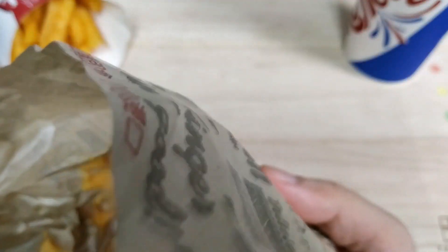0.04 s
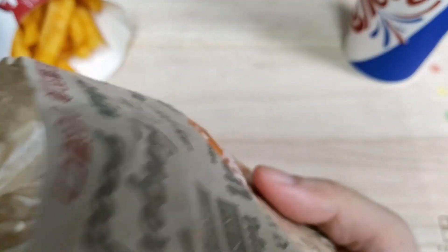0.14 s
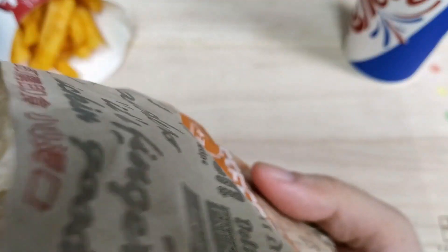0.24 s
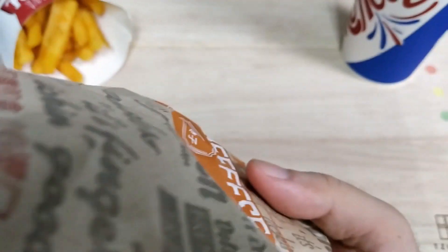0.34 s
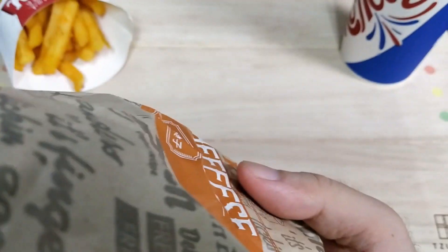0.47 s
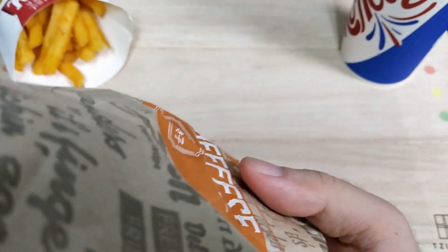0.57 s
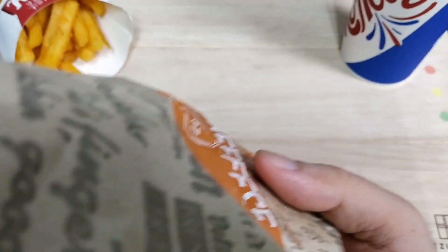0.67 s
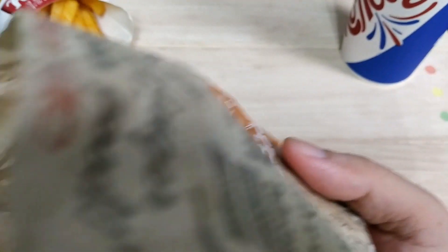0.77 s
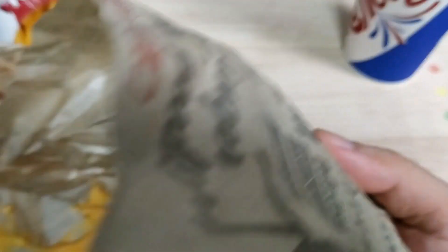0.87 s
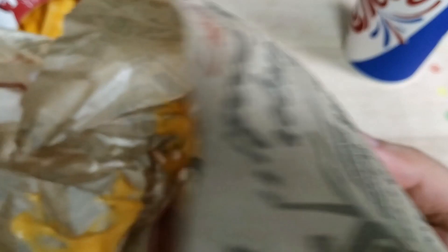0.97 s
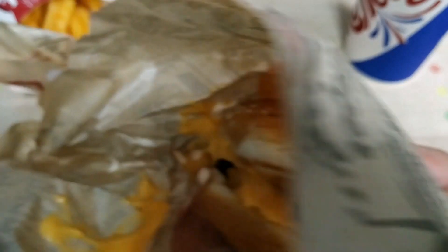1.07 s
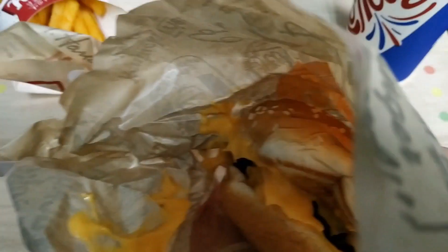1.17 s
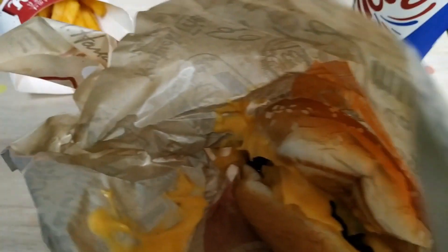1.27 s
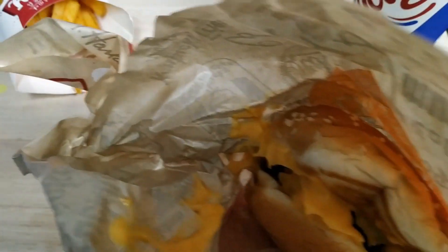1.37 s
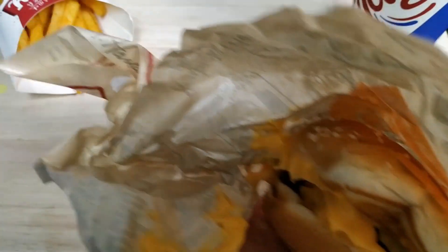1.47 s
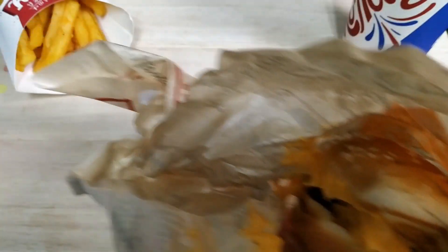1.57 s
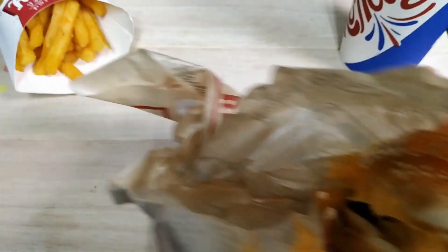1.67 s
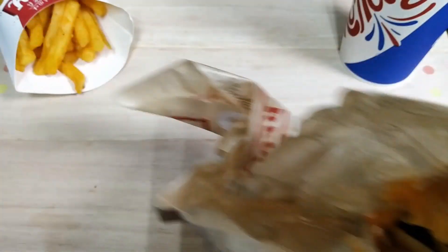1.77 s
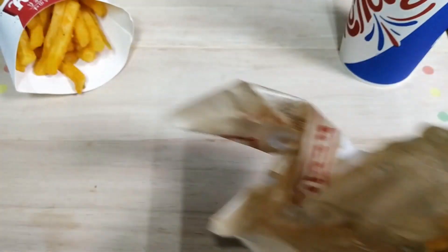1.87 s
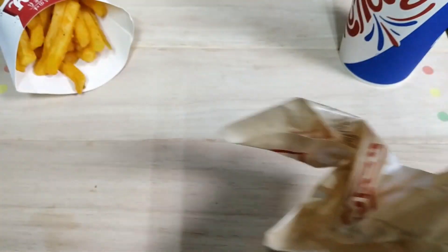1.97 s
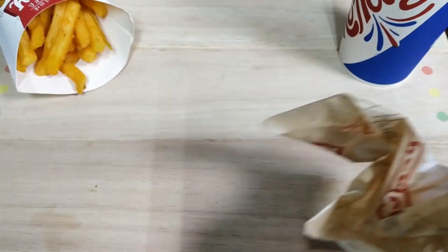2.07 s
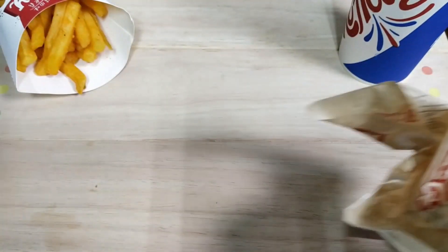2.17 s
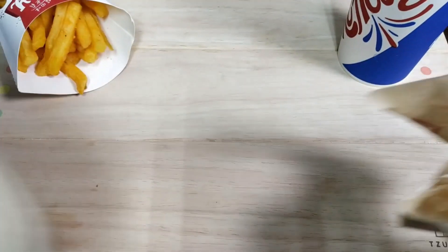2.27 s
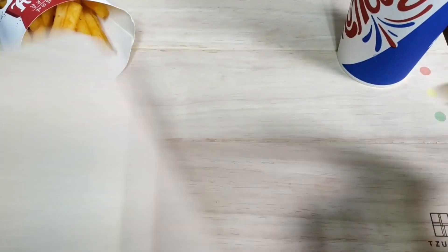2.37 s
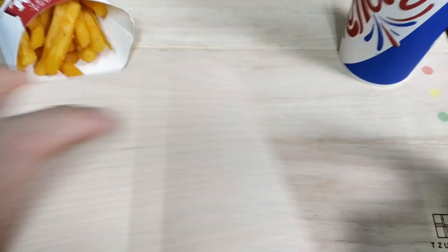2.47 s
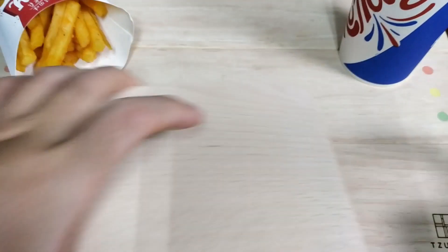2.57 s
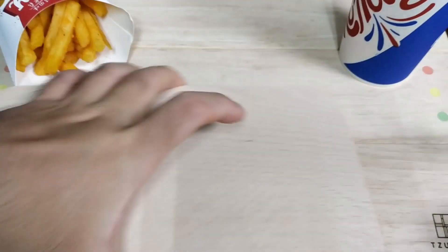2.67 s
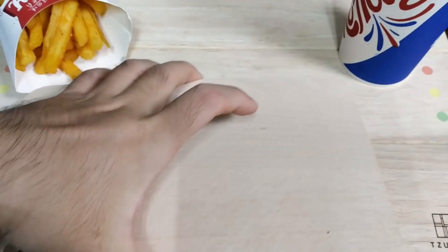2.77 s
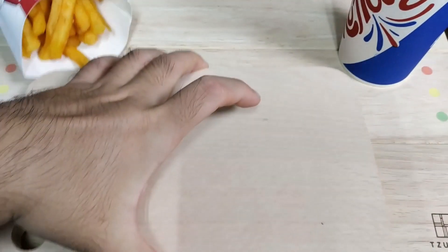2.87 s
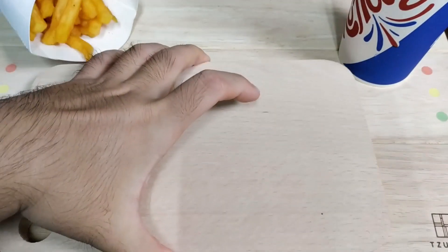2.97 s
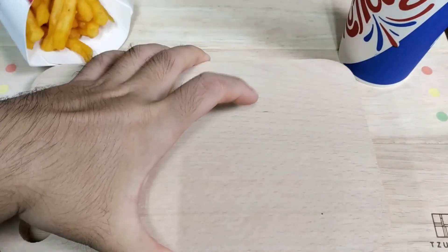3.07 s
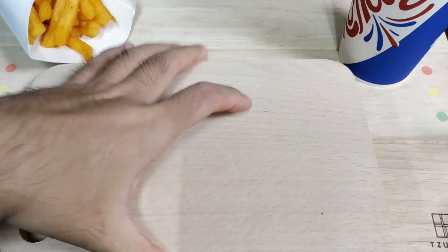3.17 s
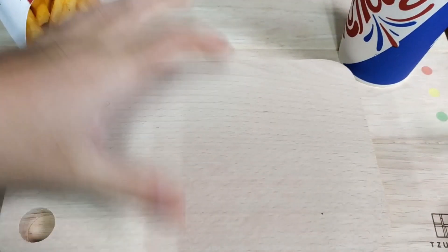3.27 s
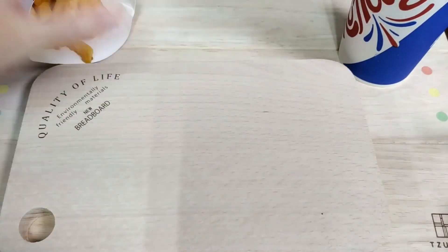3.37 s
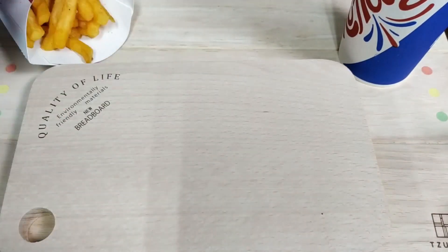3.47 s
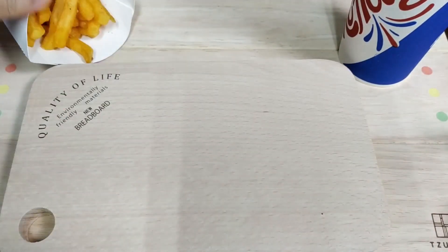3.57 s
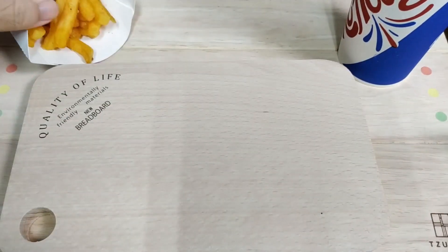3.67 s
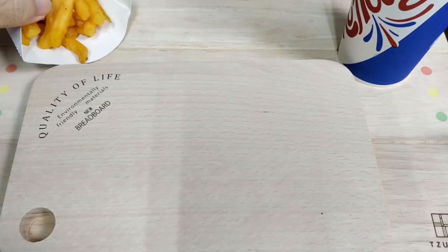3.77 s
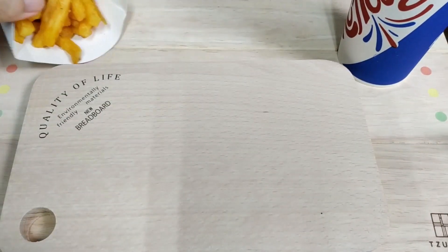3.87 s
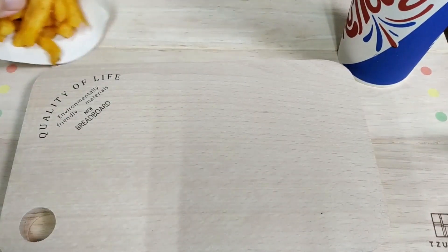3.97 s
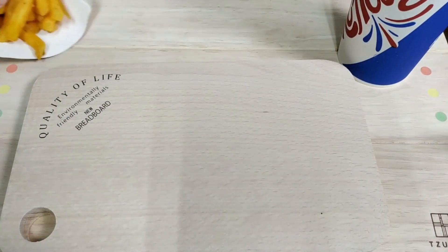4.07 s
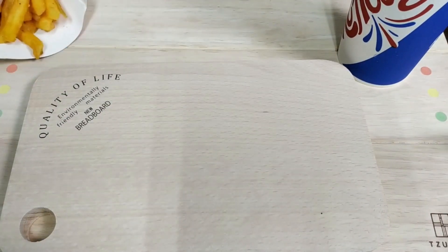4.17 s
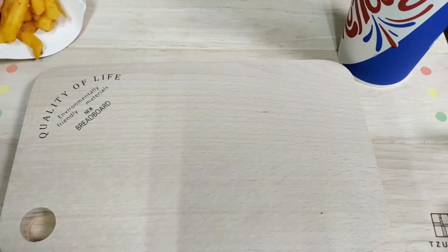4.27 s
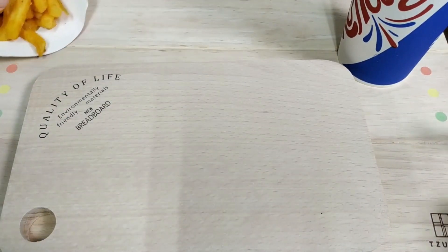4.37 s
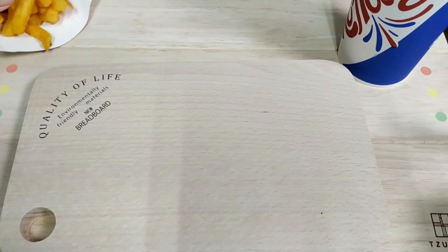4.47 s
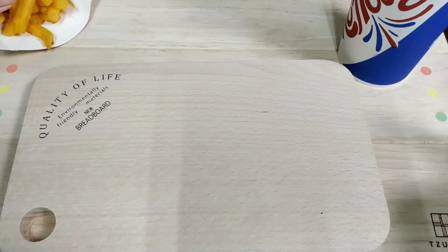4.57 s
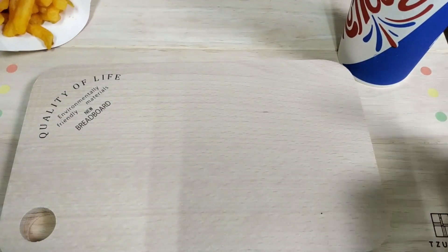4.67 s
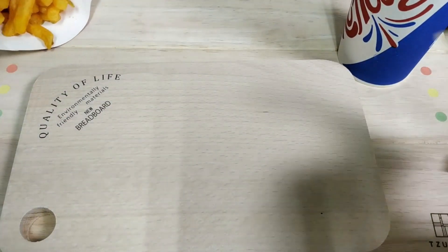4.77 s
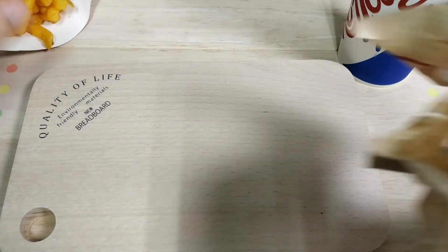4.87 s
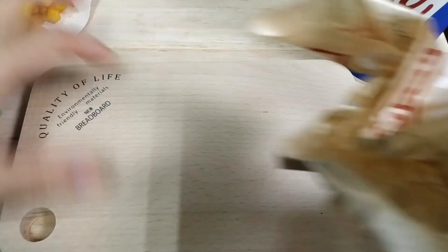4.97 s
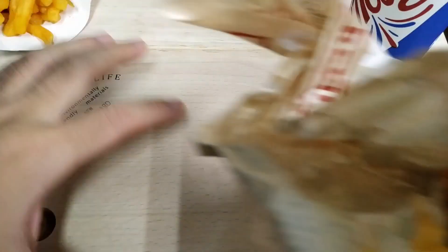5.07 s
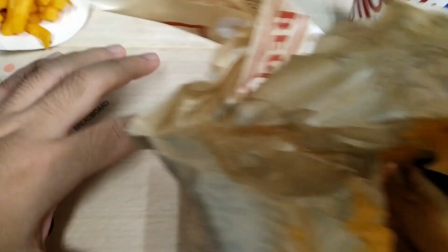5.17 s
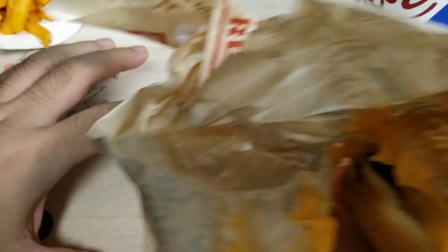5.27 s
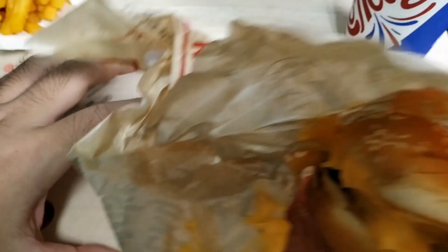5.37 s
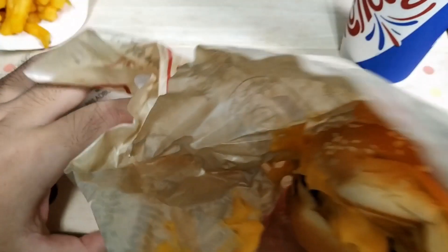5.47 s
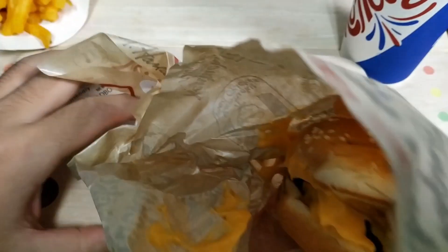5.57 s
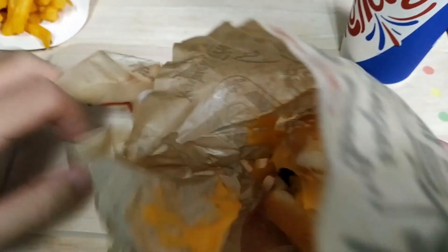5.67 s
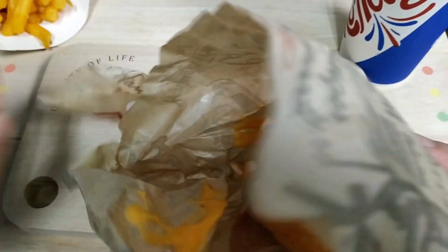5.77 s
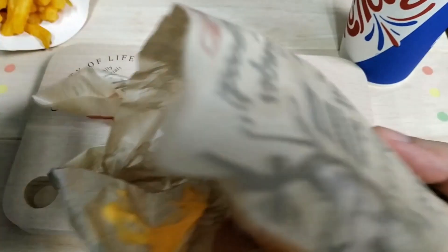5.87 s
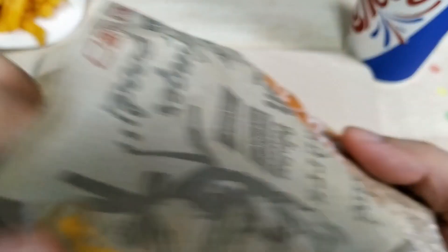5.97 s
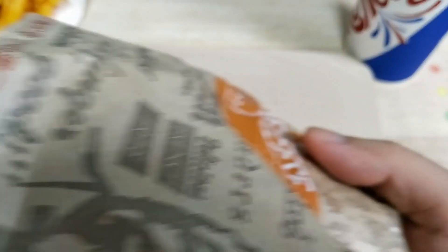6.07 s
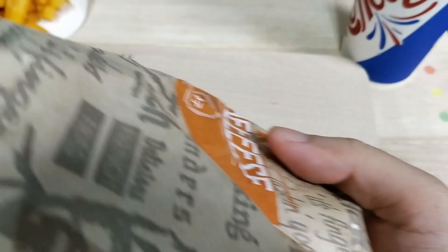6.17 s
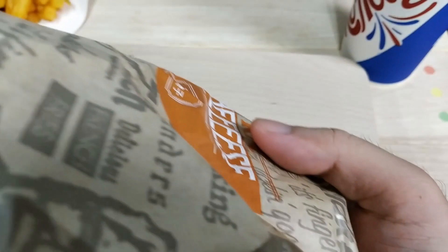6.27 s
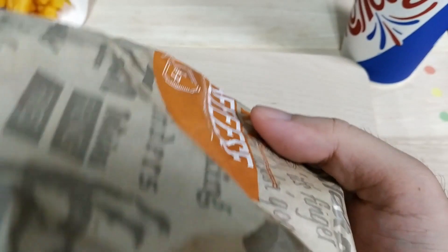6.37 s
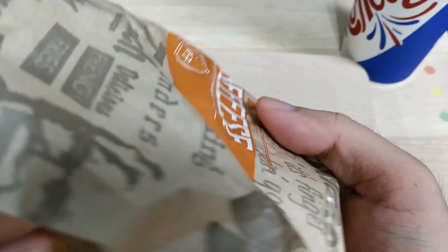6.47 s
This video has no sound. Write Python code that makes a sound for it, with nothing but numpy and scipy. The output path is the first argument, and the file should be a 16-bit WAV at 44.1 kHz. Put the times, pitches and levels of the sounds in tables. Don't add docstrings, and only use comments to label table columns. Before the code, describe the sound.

Greasy food paper snaps and rips, a board drops with a sharp woody clack, quiet room hum follows, then softer crinkling and wood dragging.

```python
import sys
import numpy as np
from scipy import signal
from scipy.fft import rfft, irfft, next_fast_len
from scipy.io import wavfile
from scipy.ndimage import uniform_filter1d

SR = 44100
rng = np.random.default_rng(int(sys.argv[2]) if len(sys.argv) > 2 else 0)


def amplitude_ratio(level_db):
    exponent = np.asarray(level_db, float) / 20
    return 10 ** exponent


def waveform_to_disk(signal):
    frames = np.transpose(np.atleast_2d(signal))
    scaled = np.clip(frames, -1, 1) * 32767
    samples = np.round(scaled).astype(np.int16)
    wavfile.write(sys.argv[1], SR, samples)


N = 287973
SIDES = np.array([[1.], [-1.]])


def level(x, db):
    return x * amplitude_ratio(db) / np.sqrt(np.mean(x ** 2))


def band(x, lo_hz, hi_hz):
    sos = signal.butter(2, [lo_hz, min(hi_hz, SR / 2.4)], "bandpass", fs=SR, output="sos")
    return signal.sosfilt(sos, x)


def ring(x, hz, t60):
    r = np.exp(-np.log(1000) / (t60 * SR))
    w = 2 * np.pi * hz / SR
    return signal.lfilter([0, r * np.sin(w)], [1, -2 * r * np.cos(w), r * r], x)


def walk(rate):
    k = int(SR / rate)
    held = np.repeat(rng.standard_normal(N // k + 1), k)
    return 0.31 * uniform_filter1d(uniform_filter1d(held, k), k)[:N]


def add(track, x, s):
    i = int(s * SR)
    track[..., i:i + x.shape[-1]] += x[..., :N - i]


def parts(x):
    edges_hz = (506, 3040, 8770)
    octaves = np.log2(np.fft.rfftfreq(x.shape[-1], 1 / SR) + 1)
    slopes = [1 / (1 + np.exp(-7 * (octaves - np.log2(hz)))) for hz in edges_hz]
    above = [1] + slopes + [0]
    return [irfft(rfft(x) * (a - b), x.shape[-1]) for a, b in zip(above, above[1:])]


def drone(table):
    s, hz, db = np.transpose(table)
    t = np.arange(N) / SR
    loudness = amplitude_ratio(np.interp(t, s, db) + 0.67 * walk(18.0))
    return np.sqrt(2) * loudness * np.sin(2 * np.pi * np.cumsum(np.interp(t, s, hz)) / SR)


def strokes(table, extra_db):
    t, power = np.arange(N) / SR, np.zeros(N)
    for (s, rise, fall, db, *_), more_db in zip(table, extra_db):
        away = np.where(t < s, (s - t) / max(rise, .004), (t - s) / max(fall, .004))
        near = away < 3
        power[near] += amplitude_ratio(2 * (db + more_db - 20 * away[near] ** 1.9))
    return power


def room_tone():
    # (frequency [Hz], level [dB per Hz])
    air = [(36, -32), (62, -1.5), (80, -10), (101, -9.5), (375, -14.5), (889, -18.5), (1350, -23),
           (15500, -41.5)]
    # (frequency [Hz], left-right correlation)
    likeness = [(60, 0.76), (130, 0.62), (290, 0.84), (640, 0.0068), (1410, 0.13), (3100, -0.35),
                (6820, -0.31), (15000, 0.55)]
    # (frequency [Hz], width [Hz], level [dB])
    fan = [(36.8, 7.5, -57.5), (46.7, 29, -59), (118, 8.6, -63), (385, 55, -68.5)]
    # (time [s], frequency [Hz], level [dB])
    motor = [(0.0, 146, -54.5), (0.4, 149, -87), (1.0, 154, -82), (1.56, 152, -52), (1.7, 148.5, -64),
             (1.89, 151.7, -57), (2.05, 147, -60.5), (2.65, 148, -64.5), (2.9, 152, -52),
             (3.4, 147.5, -52.5), (3.67, 148.8, -64.5), (4.33, 154.7, -57.5), (4.6, 156.7, -64.5),
             (5.2, 150, -66), (5.46, 148, -60), (6.53, 150, -68.5)]
    # (time [s], frequency [Hz], level [dB])
    duct = [(0.0, 49.1, -54), (0.34, 48.05, -50.5), (1.03, 48.46, -52.5), (1.4, 48.2, -52.5),
            (2.25, 47, -57.5), (3.05, 46.7, -57), (3.22, 48.4, -59), (3.44, 48, -66), (3.62, 47.5, -47.5),
            (4.07, 48, -59), (4.2, 47.65, -52), (4.93, 47.7, -60.5), (5.12, 49.4, -48), (5.4, 53.6, -52.5),
            (5.65, 53.7, -48.5), (5.85, 55.54, -54.5), (6.15, 55.94, -48), (6.53, 49.1, -57)]
    air_hz, air_db = np.transpose(air)
    like_hz, correlation = np.transpose(likeness)
    out, swell = 0, walk(0.057)
    for hz in 60 * 2 ** np.arange(0, 8.1, 1 / 3):
        like = np.clip(np.interp(np.log(hz), np.log(like_hz), correlation), -.95, .98)
        mid, side = band(rng.standard_normal((2, N)), hz / 1.127, hz * 1.131)
        db = np.interp(np.log(hz), np.log(air_hz), air_db) + 0.2 * swell + 0.5 * walk(11.0)
        out = out + amplitude_ratio(db) * (np.sqrt(1 + like) * mid + np.sqrt(1 - like) * side * SIDES)
    out = level(out, -54)
    for hz, width, db in fan:
        rumble = rng.standard_normal(N) + 0.2 * SIDES * rng.standard_normal(N)
        out = out + level(band(rumble, hz - width / 2, hz + width / 2), db)
    return (out + drone(motor) + drone(duct)) * amplitude_ratio(-.9 * SIDES)


def rubs():
    # (loudest at [s], rise [s], fall [s], level [dB], high part [dB])
    hand_strokes = [(0.02, .1, 0.062, -57.5, -1), (0.117, 0.016, 0.052, -63, 9),
                    (0.2, .035, 0.12, -68, -31), (.888, .012, .055, -65.5, 0),
                    (2.055, 0.065, 0.1, -69.5, 2), (3.82, 0.031, 0.051, -60, 3), (4.11, 0.21, 0.12, -60, 6),
                    (4.51, 0.091, 0.085, -62, 2), (4.63, 0.067, 0.091, -71.5, 1),
                    (5.1, 0.23, 0.53, -69, -3), (5.34, 0.025, 0.083, -78, -20),
                    (5.49, 0.091, 0.081, -53.5, -15.5), (5.55, 0.088, 0.062, -50, -6),
                    (5.6, 0.04, 0.25, -59.5, 4), (5.72, 0.039, 0.064, -70, 16),
                    (5.815, 0.066, 0.029, -41.5, -1), (5.86, 0.024, 0.068, -56, 0),
                    (6.035, 0.13, 0.14, -51, 0.5), (6.15, 0.13, 0.12, -52.5, 2),
                    (6.25, 0.18, 0.11, -54.5, 1.5), (6.52, 0.41, 0.092, -64, 3.5)]
    # (loudest at [s], rise [s], fall [s], level
    # [dB], high part [dB])
    palm_slides = [
        (2.47, .02, 0.16, -63, 8.5),
        (2.838, 0.049, 0.088, -45.5, -2.5),
        (2.97, 0.13, 0.06, -52, 1),
        (3.012, 0.017, 0.12, -60, 2),
        (3.262, 0.17, 0.033, -67.5, 3),
    ]
    dull_low = 0.34
    size = next_fast_len(N)
    slips = rng.standard_normal((2, size)) * amplitude_ratio(1.5 * rng.exponential(size=size))
    out = 0
    for k, part in enumerate(parts(slips)[1:]):
        power = 0
        for table, low_db, pan_db in ((hand_strokes, -3, -3), (palm_slides, 2.5, -2)):
            high_db = np.array([row[-1] for row in table])
            part_db = (low_db - dull_low * high_db, 0 * high_db, high_db)[k]
            power = power + amplitude_ratio(SIDES * pan_db) * strokes(table, part_db)
        out = out + np.sqrt(power) * amplitude_ratio(4.4 * walk(30)) * level(part[:, :N], 0)
    lag = (0.000357 + 0.00027 * walk(6)) * SR
    now = np.arange(N)
    mirror = [np.interp(now - lag * k, now, side) for side, k in zip(out, (.9, 1.2))]
    return (out + 0.4 * np.array(mirror)) * amplitude_ratio(2.0 + 4.9 * walk(90))


def snap(cracks, hz, t):
    cracks = level(cracks, 0) + 12 * (np.arange(len(t)) == 24)
    cracks = level(cracks, 0) + level(ring(cracks, hz, 5 / hz), -1.4)
    shape = (1 - np.exp(-t / 0.00035)) * (np.exp(-t / 0.001) + amplitude_ratio(-1.0) * np.exp(-t / 0.0042))
    return [shape * part for part in parts(cracks)[1:]]


def rip(cracks, ms, t):
    pace = amplitude_ratio(2.9 * np.repeat(rng.standard_normal(32), 64))
    shape = pace * np.clip(t / 0.0016, 0, 1) * np.clip((ms / 1000 - t) / 0.0011, 0, 1)
    return [shape * part for part in parts(cracks)[1:]]


def crackle(table, shape, smooth):
    out, walls = np.zeros((2, N)), np.zeros((2, N))
    even = parts(1. * (np.arange(2048) == 64))[1:]
    t = np.arange(2048) / SR
    for s, db, low_db, high_db, pan_db, own in table:
        cracks = rng.standard_normal(2048) * amplitude_ratio(2 * rng.standard_normal(2048))
        pieces = [amplitude_ratio(db + part_db) * part / np.abs(part).max()
                  for part, part_db in zip(shape(cracks, own, t), (low_db, 0, high_db))]
        crack = sum(pieces)
        spread = crack
        if smooth:
            spread = sum(e * np.linalg.norm(p) / np.linalg.norm(e) for e, p in zip(even, pieces))
        lag = int(round(1.8 * pan_db))
        for side, sign in enumerate((1, -1)):
            heard = crack + .15 * np.roll(crack, rng.integers(8, 60))
            add(out[side], amplitude_ratio(sign * pan_db / 2) * heard, s + max(-sign * lag, 0) / SR)
            add(walls[side], amplitude_ratio(sign * pan_db / 4) * spread, s)
    return np.array([out, walls])


def creases():
    # (time [s], peak [dB], high part [dB], left minus right [dB], ring [Hz])
    flips = [(0.0517, -28.5, 18, -0.5, 6440), (0.0751, -19.5, 4, -1.5, 4400), (0.0888, -30, -1, 5, 5500),
             (0.106, -26, -4, -2, 8370), (0.164, -25, -25, -9.5, 2620), (0.164, -22, -3, -10, 4750),
             (0.2486, -41, -22, 0.5, 1560), (0.248, -41, -22, 0, 2750), (0.6488, -23, -23, -14, 3250),
             (0.6482, -29, -12, -8, 5400), (.652, -48, -20, -5, 1490), (0.8161, -29, 7.5, -8.5, 4480),
             (0.86, -27.5, 3, -12.5, 8500), (0.8737, -30.5, 8, -12.5, 4840), (2.073, -47, 13, -4, 9300),
             (2.2573, -48, -15, 5, 1422), (2.4405, -20.5, 10, 14.5, 7620),
             (2.4406, -28.5, 16.5, 13.5, 13400), (2.452, -27, -3, 8, 8000), (2.9956, -19.5, 9.5, 3.5, 4170),
             (3.244, -45, -5, 1, 2180), (3.805, -42, -4, 2, 1140), (4.0757, -43, -1, -3.5, 7970)]
    # (time [s], peak [dB], high part [dB], left minus right [dB], ring [Hz])
    flips_back = [(5.191, -37, -20, 3.5, 2110), (5.2728, -32.5, 9, 2, 8700), (5.3066, -33, 4, 12, 6500),
                  (5.3162, -30, -6, 10, 1720), (5.5606, -26.5, 9, 4.5, 6940), (5.71, -26, 2.5, -10, 8700),
                  (5.773, -37, 8, -5, 8410), (5.7962, -38, -19.5, -11, 8670), (5.808, -43, -18, 1, 6930),
                  (5.8215, -28.5, -12, -1.5, 1450), (5.8824, -36.5, 5, -1, 1300),
                  (5.9507, -42.5, -17, 5, 1600), (6.4863, -47, -5, -10, 7490)]
    # (time [s], peak [dB], high part [dB], left minus right [dB], length [ms])
    tears = [(0.033, -48, 16, -0.5, 15), (0.044, -34, 0, 4, 7.3), (0.053, -31.5, 8, -1, 9),
             (0.061, -28, 6, -0.5, 9.4), (0.07, -28.5, 6, -1, 12.4), (0.0914, -24.5, 3, -3, 8.3),
             (.104, -26, -1, -8.5, 6.9), (5.179, -40, 7, 9, 5.9), (5.183, -41.5, 9, 13.5, 13),
             (5.237, -41, -2, 11, 29.5), (5.261, -41, 3, 5, 17), (5.273, -37, 8.5, 12.5, 20),
             (5.306, -33, 8, 11.5, 10.3)]
    # (time [s], peak [dB], low part [dB], length [ms])
    edge_scuffs = [
        (2.744, -57, 13, 3.1),
        (2.767, -27, -5, 2.7),
        (2.814, -31, 2, 5.4),
        (2.851, -30, -3, 3.5),
    ]
    big_low_db, small_low_db, big_below_hz = 3, -12.5, 2400
    snaps = []
    for s, db, high_db, pan_db, hz in flips + flips_back:
        bigness = 1 / (1 + (hz / big_below_hz) ** 6)
        low_db = small_low_db + (big_low_db - small_low_db) * bigness
        snaps.append((s, db, low_db, high_db, pan_db, hz))
    rips = [(s, db, -6.5, high_db, pan_db, ms) for s, db, high_db, pan_db, ms in tears]
    scuffs = [(s, db, low_db, -2.5, 6, ms) for s, db, low_db, ms in edge_scuffs]
    return crackle(snaps, snap, True) + crackle(rips + scuffs, rip, False)


def thumps():
    # (time [s], peak [dB], frequency [Hz], t60 [s])
    soft_blows = [(0.072, -33.5, 150, 0.034), (0.117, -41.5, 106, 0.18), (2.435, -24.5, 228.6, 0.011),
                  (3.003, -27, 118, 0.066), (3.034, -37, 110, 0.073), (3.081, -21.5, 109, 0.038),
                  (4.08, -40, 118, 0.054), (4.66, -50.5, 114.4, 0.29), (4.83, -47.5, 110.6, 0.28),
                  (5.188, -35.5, 142, 0.077), (5.312, -21.5, 212, 0.014), (5.325, -35, 175, 0.083),
                  (5.459, -57, 112, 0.058), (5.661, -46, 110, 0.084)]
    # (time [s], peak [dB], frequency [Hz], t60 [s])
    taps = [(.2475, -32, 1510, 0.019), (.2475, -32, 2800, 0.016), (0.651, -39.5, 1480, 0.022),
            (2.744, -42, 1930, 0.017), (3.03, -34, 524, .06), (5.314, -36, 1733, .04),
            (0.068, -40, 337, 0.068), (2.997, -27, 332, 0.034), (3.039, -31.5, 398, 0.042),
            (3.082, -34, 303, 0.035), (5.193, -45, 358, 0.06), (5.274, -44, 339, 0.11),
            (5.315, -30.5, 362, 0.047), (5.557, -40, 388, 0.085), (5.468, -47, 1180, .08),
            (5.522, -38, 519.5, 0.24), (5.523, -42, 1120, .06), (5.54, -39, 1063, 0.075),
            (5.548, -43, 291, 0.16), (5.243, -43, 563, 0.053), (5.809, -37.5, 385, 0.051)]
    out, t = np.zeros(N), np.arange(8192) / SR
    for s, db, hz, t60 in soft_blows + taps:
        swell = (1 - np.exp(-t / 0.0011)) * np.exp(-np.log(1000) * t / t60)
        add(out, amplitude_ratio(db) * np.sin(2 * np.pi * hz * t) * swell, s)
    return out


def body(force, modes, lag, upper_hz=1000):
    out = np.zeros((2, N))
    for k, (hz, db, t60, pan_db) in enumerate(modes):
        drive = force if force.ndim == 1 else force[int(hz > upper_hz)]
        tone = (-1) ** k * amplitude_ratio(db) * ring(drive, hz, t60)
        out += amplitude_ratio(pan_db * SIDES / 2) * np.array([tone, np.roll(tone, int(lag * pan_db))])
    return out


def board():
    # (time [s], peak [dB], contact [ms], share of table bass [dB], upper modes [dB])
    blows = [
        (2.767, -5.5, 0.27, -1.5, -4),
        (2.804, -11.5, 0.51, 4, 6),
        (2.852, -25, 0.19, 4.5, -9),
        (2.994, -24, 0.63, 10.5, -3),
        (3.028, -32, 1, 13, 0),
        (3.074, -35.5, 0.86, 16, -3),
        (3.144, -47.5, 0.32, -11, -3),
        (5.186, -44, 0.95, 15, -10),
        (5.273, -39.5, 0.83, -7, -3),
        (5.315, -41, 0.68, 1, -3),
    ]
    # (frequency [Hz], level [dB], t60 [s], left minus right [dB])
    free_modes = [(486, -15.5, 0.075, 1), (523.3, -0.5, 0.078, 3.5), (552, -12.5, 0.061, 3),
                  (599, -23.5, 0.55, -7), (690, -30, 0.033, 13), (805, -19, 0.11, -0.5),
                  (960, -31, 0.053, 4), (1194, -10.5, 0.11, 1.5), (1234, -21, 0.41, -1),
                  (1264, -15, 0.12, -7), (1680, -21, 0.15, 3), (1750, -16, 0.15, 4),
                  (2400, -13, 0.052, 7.5)]
    # (frequency [Hz], level [dB], t60 [s], left minus right [dB])
    held_modes = [(298, -3, 0.028, 3.5), (381, -10, 0.059, -1), (521, -5.5, 0.054, 1.5),
                  (596, -13, 0.05, 1.5), (710.4, -8, 0.024, -1), (1038, -10.5, 0.074, -1),
                  (1116, -6, 0.045, -0.5), (1200, -12, 0.064, 0.5)]
    # (frequency [Hz], level [dB], t60 [s], left minus right [dB])
    clack_modes = [(893.6, 4, 0.013, 2), (1300, -1, 0.0043, 2), (1740, 1.5, 0.0095, 1),
                   (3250, -1, 0.0084, 2.5), (2540, 0.5, 0.0076, 2.1)]
    # (frequency [Hz], level [dB], t60 [s], left minus right [dB])
    table_modes = [(97, -2, 0.075, 1), (117.4, 1.5, 0.29, -1.5), (183.6, -11, 0.32, 3),
                   (209.7, -8.5, 0.25, 1.1), (246.4, -7.5, 0.19, -9.5), (280.5, -2.5, 0.074, -1.5)]
    # (loudest at [s], rise [s], fall [s], level [dB])
    drags = [
        (5.47, .1, 0.097, -45.5),
        (5.54, 0.066, 0.064, -41),
        (5.82, 0.078, 0.013, -45),
        (6.04, .15, 0.036, -59),
        (6.2, 0.18, .11, -54.5),
    ]
    pressed_s, pressed_t60_s = 2.994, .06
    push = np.zeros((2, 2, N))
    thud, chatter, t = np.zeros(N), np.zeros((2, N)), np.arange(4096) / SR
    for s, db, ms, bass_db, upper_db in blows:
        contact = np.hanning(int(max(ms, .1) * SR / 1000) + 2)
        contact = contact / contact.sum()
        add(push[int(s > pressed_s - .01)], amplitude_ratio(db + np.array([[0], [upper_db]])) * contact, s + .0007)
        add(thud, amplitude_ratio(db + bass_db) * contact, s)
        rattle = rng.standard_normal((2, 4096)) * np.exp(-t / 0.017)
        add(chatter, amplitude_ratio(db - 9.0) * rattle, s + 0.00071)
    drag = np.sqrt(strokes(drags, np.zeros(len(drags))))
    ticks = (rng.random(N) < 900 / SR) * rng.standard_normal(N) * drag * amplitude_ratio(2.0 * walk(73))
    stilled = amplitude_ratio(-60 * np.clip(np.arange(N) / SR - pressed_s, 0, 1) / pressed_t60_s)
    free, held = (body(amplitude_ratio(-3.5) * force, free_modes, 4.0) for force in push)
    clack = body(amplitude_ratio(-3.5) * push[:, 0].sum(axis=0), clack_modes, 3.9)
    sliding = body(amplitude_ratio(-4) * ticks, held_modes, 7.0)
    knock = -free * stilled - held - clack + sliding
    rattling = band(chatter[0] + .5 * SIDES * chatter[1], 260, 1580)
    return knock + rattling + body(amplitude_ratio(-16.5) * thud, table_modes, 1.7)


def squeak():
    # (time [s], frequency [Hz], level [dB])
    whistle = [
        (4.98, 9400, -79),
        (5.05, 10100, -76),
        (5.15, 10800, -67),
    ]
    t = np.arange(N) / SR
    inside = np.minimum(t - whistle[0][0], whistle[-1][0] - t)
    return drone(whistle) * np.clip(inside / .02, 0, 1)


def room(near):
    # (t60 [s], level [dB])
    tail = [(0.59, -16), (0.33, -12), (0.43, -18.5), (0.37, -21)]
    t = np.arange(SR // 2) / SR
    bass, *rest = parts(rng.standard_normal((2, len(t))))
    bass = bass[0] + 0.37 * SIDES * bass[1]
    fade = [amplitude_ratio(db - 60 * t / t60) * np.clip(t / 0.0037, 0, 1) for t60, db in tail]
    echo = sum(part * f for part, f in zip([bass, *rest], fade))
    return signal.fftconvolve(near, amplitude_ratio(-25.5) * echo, axes=1)[:, :N]


def scene():
    cracks, walls = creases()
    rest = rubs() + board() + thumps() + squeak()
    near = cracks + rest + room(walls + rest)
    return near + 0.31 * band(near, 6830, 10500) + room_tone()


def band_limit(x):
    return signal.sosfilt(signal.butter(12, 16550, fs=SR, output="sos"), x)


def record(dry):
    passed = signal.sosfilt(signal.butter(4, 36, "highpass", fs=SR, output="sos"), dry)
    passed = signal.sosfilt(signal.ellip(8, .3, 50, 15750, fs=SR, output="sos"), passed)
    return band_limit(passed)


dry = scene()
out = record(dry)
waveform_to_disk(out)
```